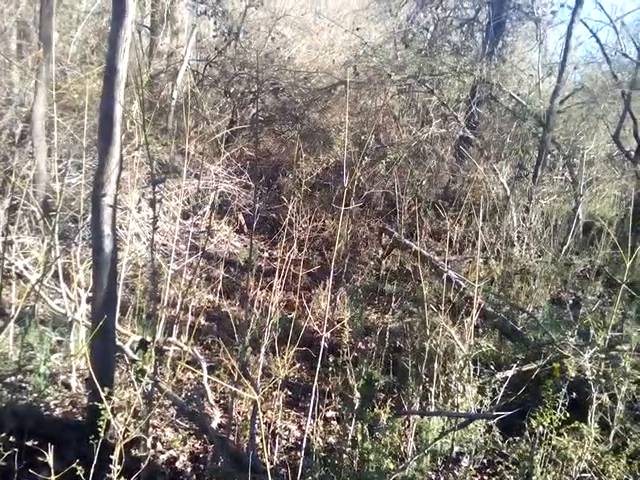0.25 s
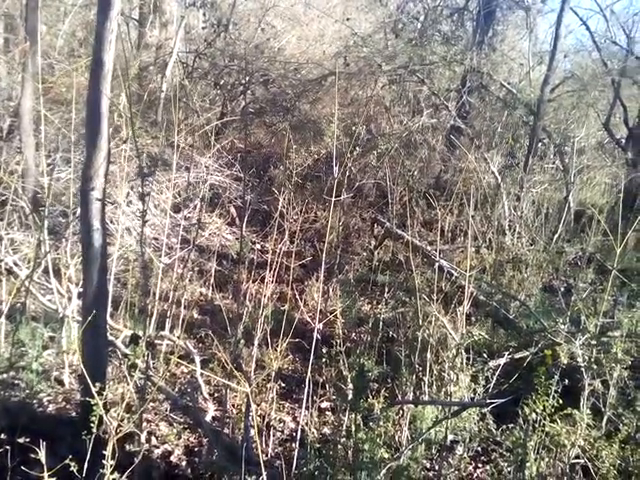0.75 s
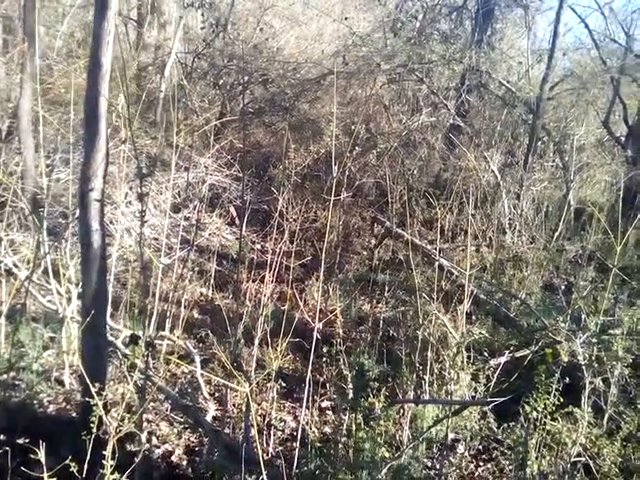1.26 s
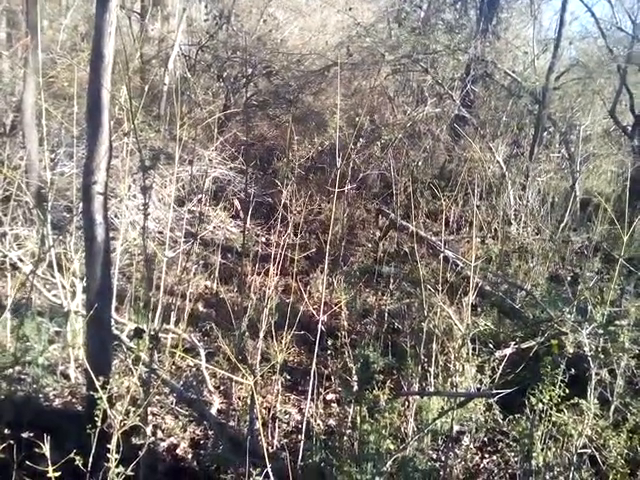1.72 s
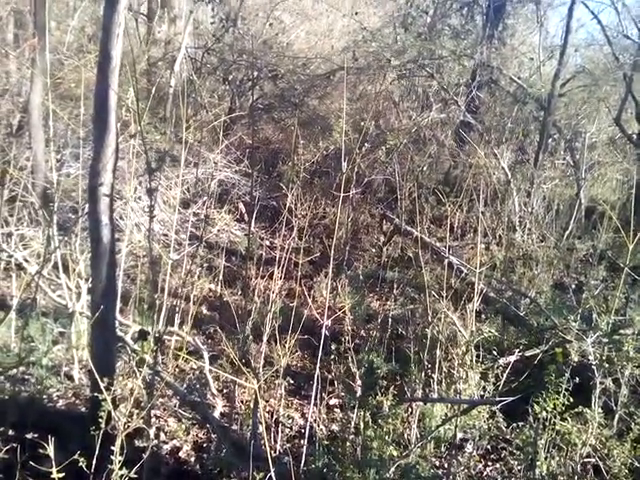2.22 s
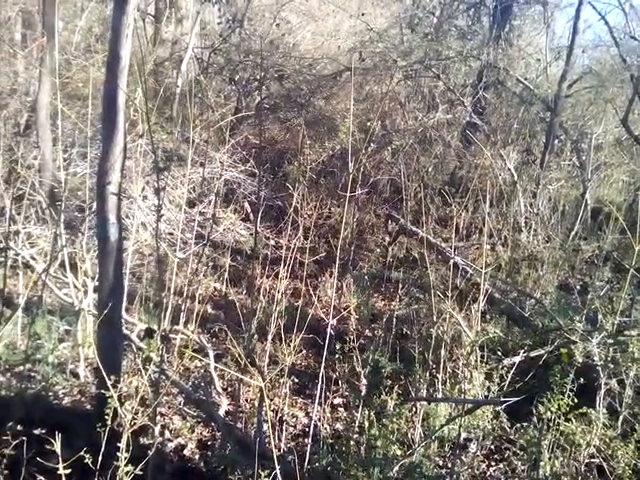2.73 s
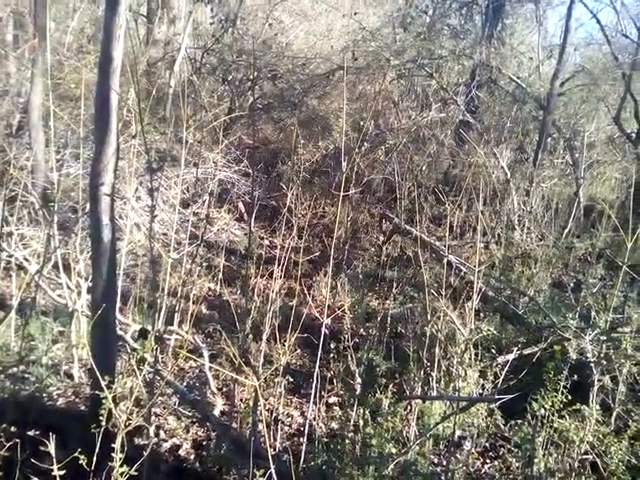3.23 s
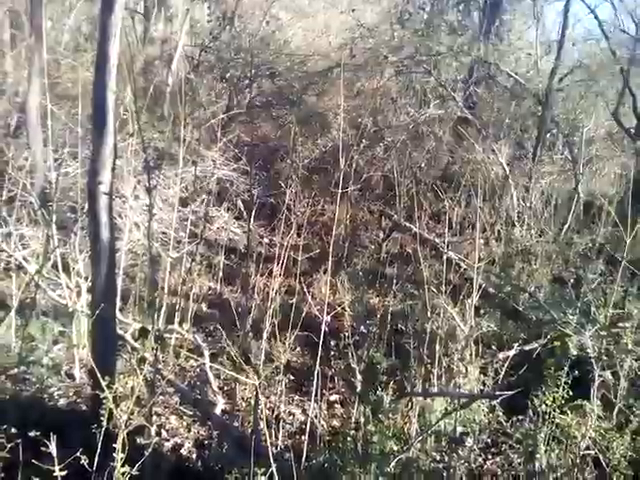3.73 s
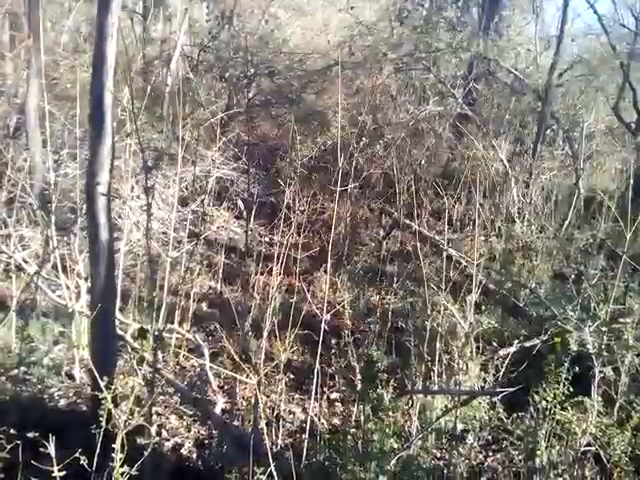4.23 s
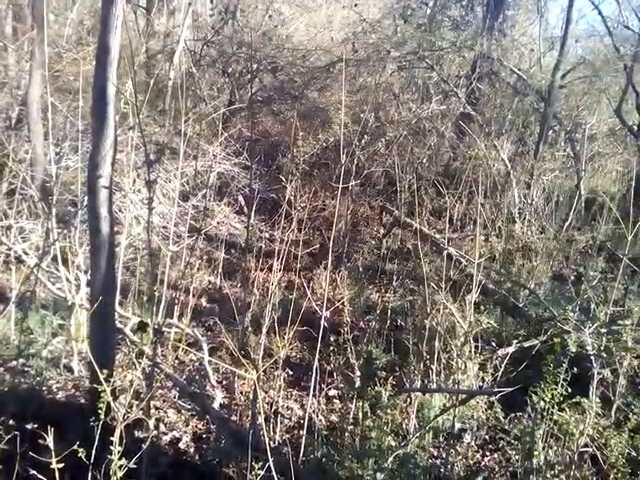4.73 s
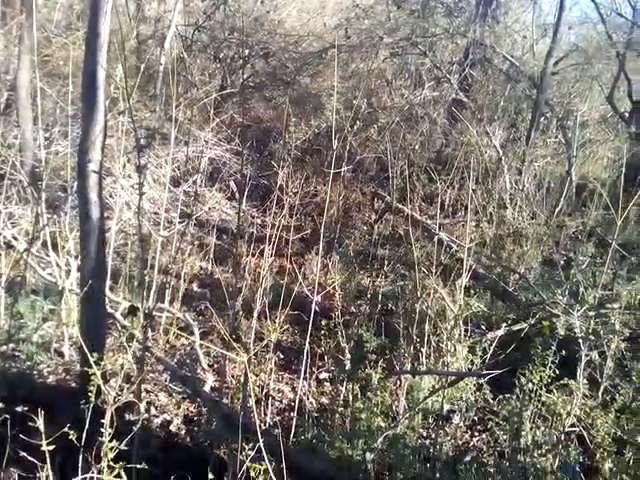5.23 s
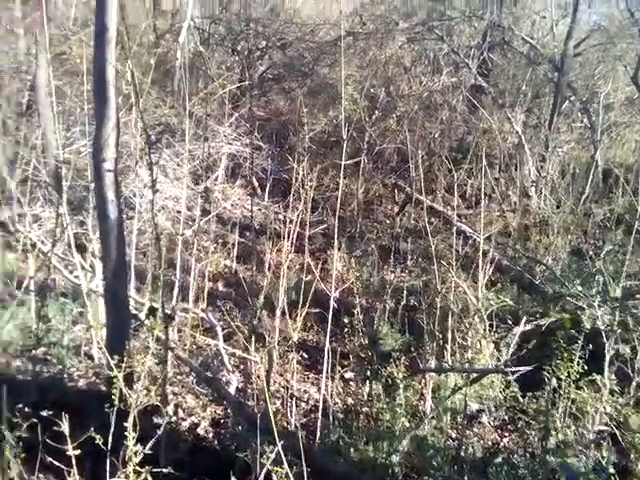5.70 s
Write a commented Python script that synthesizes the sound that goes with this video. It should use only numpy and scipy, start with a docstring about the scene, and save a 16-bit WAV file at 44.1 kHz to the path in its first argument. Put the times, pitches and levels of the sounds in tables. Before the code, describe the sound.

A single distant hound gives one short breaking bay that echoes through winter woodland, while small birds call and twigs snap loudly close by.

```python
"""Winter woodland: a hound far off gives one breaking bay, drawn as a few wavering harmonics,
that rings on among the trunks. Small birds, gliding tones, call near and far, and a wren rolls
its motif. Close to the hand-held microphone twigs snap, two of them loudly, as struck resonances;
dry leaves rustle in grainy noise and the hand bumps the case in single low cycles and rumbles on it.
Behind it all lie a rumble of shaped noise and a wavering two-tone motor hum."""
import sys
import numpy as np
from scipy import signal
from scipy.fft import rfft, irfft
from scipy.io import wavfile
from scipy.ndimage import uniform_filter1d

SR = 44100
rng = np.random.default_rng(int(sys.argv[2]) if len(sys.argv) > 2 else 0)


def output_pcm(signal):
    """Save a mono or channel-first signal as 16-bit PCM at the path in sys.argv[1].

    Samples are clipped to [-1, 1] before scaling.
    """
    pcm = np.clip(np.atleast_2d(signal).T, -1, 1) * 32767
    wavfile.write(sys.argv[1], SR, np.round(pcm).astype(np.int16))


N = 262836
T = np.arange(N) / SR  # s

# main note of the bay, before BAY_TRIM_DB
# columns: t/s, level of the fundamental/dB, level of the 2nd harmonic/dB, level of the 3rd/dB
BAY_NOTE = [(1.292, -37.5, -43.5, -83.5), (1.312, -40.5, -53, -56), (1.336, -34.5, -48, -40),
            (1.358, -53.5, -54.5, -43), (1.382, -32, -47, -42), (1.412, -35.5, -44, -43),
            (1.43, -40.5, -47, -55)]
# two cracked high notes that open the bay
# columns: t/s, length/s, mid-note f/Hz, level/dB, 2nd and 3rd harmonic level against the fundamental/dB
CRACKED_NOTES = [(1.235, .018, 944, -40, -25, -4), (1.25, .036, 1210, -40, -13.5, -26)]
CRACK_RISE_HZ_PER_S, NOTE_EDGE_S = 500, 0.0027
BAY_HZ, BAY_DROP_HZ, BAY_SETTLE_S, BAY_TRIM_DB = 657.8, 105.7, 0.02183, -.6


def bay_notes():
    """Pitch and three harmonic gains per note: the voice cracks twice, then sinks to its main pitch."""
    times, *levels = np.transpose(BAY_NOTE)
    hz = BAY_HZ + BAY_DROP_HZ * np.exp(-np.maximum(T - times[0], 0) / BAY_SETTLE_S)
    level_db = BAY_TRIM_DB + np.array([np.interp(T, times, level) for level in levels])
    notes = [(hz, undb(level_db) * gate(times[0], times[-1], NOTE_EDGE_S))]
    for s, length, mid_hz, db, second_db, third_db in CRACKED_NOTES:
        hz = mid_hz + CRACK_RISE_HZ_PER_S * np.clip(T - s - length / 2, -length, length)
        level_db = db + np.array([[0], [second_db], [third_db]])
        notes.append((hz, undb(level_db) * gate(s, s + length, NOTE_EDGE_S)))
    return notes


# the ring of an earlier bay on the same note is still heard at the start
RING_DB, RING_END_S = -59.5, .27


def hound(jitter=0.0068, upper_db=-26, hoarse_db=-19.5, slope_delay_s=.275, slope_db=-13):
    """A cracking voice of unsteady harmonics and hoarse breath; the far slope throws it back."""
    rasp = colour(rng.standard_normal(N), [(500, -22), (1000, 11), (1900, -21), (2950, 6),
                                           (3700, -5.5), (4400, -21), (5900, 1), (7500, -22)])
    waver, voice = 1 + jitter * walk(300), 0
    for hz, gains in bay_notes():
        phase = 2 * np.pi * np.cumsum(hz * waver) / SR
        main = sum(gain * np.sin(k * phase) for k, gain in enumerate(gains, 1))
        upper = sum(np.sin(k * phase) / (1 + (k * hz / 4000) ** 8) for k in (4, 5, 6))
        # the strained high notes are the hoarsest, and the breath pulses with the voice
        hoarse = undb(hoarse_db) * (hz / 1235) ** 2 * (1 + np.sin(phase)) * rasp
        voice = voice + main + gains[0] * (undb(upper_db) * upper + hoarse)
    voice *= np.sqrt(2) * undb(walk(250))
    add(voice, slope_delay_s, undb(slope_db) * ring(voice, 1030, 540))
    earlier = np.sin(2 * np.pi * np.cumsum(BAY_HZ * (1 + 0.013 * walk(61))) / SR)
    voice += undb(RING_DB + 3.1 * walk(21.2)) * earlier * gate(-1, RING_END_S, .08)
    return woods(voice, wet_db=-3, t60=1.93, thicket_db=-8, thicket_t60=0.171, damping=0.58)


# twigs breaking
# columns: t/s, level/dB, f of the crack/Hz, width of the crack/Hz, splintering level/dB
TWIG_SNAPS = [(1.334, -32, 6500, 4000, 1), (1.4150, 12, 6100, 3200, -7), (1.727, -30, 5970, 4844, -2),
              (3.548, -30.5, 6050, 3500, 1), (5.622, -23, 6000, 5000, -15), (5.6424, -2.5, 2980, 6660, -22)]
# modes of dry twigs; columns: f/Hz, width/Hz, level/dB
TWIG_MODES = [(1496, 250, -2), (3150, 270, -7.5), (4100, 280, -8), (6530, 580, -9.5)]


def twigs(splinter_s=0.013, tick_db=-19, thud_db=-16, dull_hz=9500):
    """A sharp break rings the wood; its last fibres part just after."""
    out = np.zeros(N)
    t = T[:SR // 20]
    for s, db, hz, width_hz, splinter_db in TWIG_SNAPS:
        fibres = rng.standard_normal(len(t)) * undb(2.8 * rng.standard_normal(len(t)))
        fibres /= 1 + (t / splinter_s) ** 8
        force = signal.unit_impulse(len(t)) + undb(splinter_db) * fibres / np.linalg.norm(fibres)
        crack = ring(ring(force, hz, width_hz), hz, width_hz)
        body = undb(-0.5) * crack
        for mode_hz, mode_width_hz, mode_db in TWIG_MODES:
            body = body + undb(mode_db) * ring(crack, mode_hz, mode_width_hz)
        body = signal.lfilter(*signal.butter(2, dull_hz, fs=SR), body)
        # thinner, higher twigs also give more of a bright tick; the ground answers with a dull thud
        tick = undb(tick_db) * (hz / 6000) ** 5 * ring(force, 12400, 3000)
        thud = undb(thud_db) * ring(force, 210, 210)
        add(out, s, undb(db) * (body + tick + thud))
    return woods(out, wet_db=-22, t60=1.2, thicket_db=-19.5, thicket_t60=0.54)


# scuffs in the leaf litter
# columns: t/s, length/s, crackle level/dB, low thud level against the crackle/dB
LEAF_SCUFFS = [(5.734, 0.033, -49.5, -23), (5.772, 0.023, -53, -11), (5.789, 0.0124, -56.5, 9.5),
               (5.805, .012, -55, -8)]
# slow swells of stirring leaves; columns: middle t/s, half length/s, level/dB
LEAF_STIRS = [(.05, 0.37, -65.5), (2.9, 0.87, -71.5), (3.48, .13, -67.5), (5.46, 0.15, -57.5),
              (5.64, 0.074, -58.5), (5.83, .1, -60)]
# spectrum of the crackle; columns: f/Hz, relative level/dB
LEAF_SPECTRUM = [(200, 7), (600, 4.5), (1500, -1), (2500, -2), (4500, -2), (6800, -4), (11000, -18),
                 (16000, -32)]
RUSTLE_DB = -74  # steady part, under the stirs


def leaves():
    """Many tiny breaks make a dense crackle; it swells with each stir and scuff, and scuffs also thud."""
    grains = rng.standard_normal(N) * undb(3 * rng.exponential(size=N))
    crackle = colour(grains, LEAF_SPECTRUM)
    thud = unit(ring(ring(rng.standard_normal(N), 330, 340), 330, 340))
    push = (undb(RUSTLE_DB) + swells(LEAF_STIRS)) * undb(2 * walk(45))
    weight = np.zeros(N)
    for s, length, db, thud_db in LEAF_SCUFFS:
        scuff = undb(db) * signal.windows.tukey(int(length * SR), .2)
        add(push, s, scuff)
        add(weight, s, undb(thud_db) * scuff)
    return crackle * push + thud * weight


# bumps of the hand on the case; columns: t of the peak/s, peak level/dB
HAND_BUMPS = [(.520, -32), (0.585, -36.5), (.608, -28), (2.746, -27), (2.813, -38), (4.421, -44),
              (4.46, -37.5), (4.524, -38)]
BUMP_HZ = 97.6


def bumps(cycles=0.39):
    """Each bump rocks the case for about one low cycle."""
    out = np.zeros(N)
    t = T[:SR // 10] - .05  # centred on the peak
    rock = -np.cos(2 * np.pi * BUMP_HZ * t) * np.exp(-.5 * (t * BUMP_HZ / cycles) ** 2)
    for s, db in HAND_BUMPS:
        add(out, s + t[0], undb(db) * rock)
    return out


# thin high calls that fall to a held pitch and then warble above it
# columns: t/s, held f/Hz, level/dB, warble depth/Hz, level change in the warble/dB
THIN_CALLS_NEAR = [(.018, 7280, -46, 550, -5), (1.161, 8250, -56.5, 1310, 1), (2.406, 7250, -56.5, 500, -8)]
THIN_LENGTH_S, THIN_FALL, THIN_SETTLE_S = .15, 0.24, .019  # the fall is a share of the held pitch
THIN_WARBLE_AFTER_S, THIN_WARBLE_RATE_HZ = .06, 30
# short falling chips; columns: t/s, level/dB
FALLING_CHIPS = [(0.918, -55), (2.052, -57), (3.237, -56), (5.308, -61)]
CHIP_LENGTH_S, CHIP_START_HZ, CHIP_END_HZ = 0.0087, 5660, 5360
# even whistles; columns: t/s, length/s, f/Hz, level/dB
EVEN_WHISTLES = [(0, 0.028, 4900, -61.5), (0, 0.032, 4420, -60.5), (2.447, .13, 4955, -56.5),
                 (3.19, .05, 1857, -61), (4.585, 0.028, 4420, -64.5), (4.667, .032, 4300, -71)]


def near_birds():
    """Small birds on nearby branches: single tones that fall and warble, chip or hold their pitch."""
    out, t = np.zeros(N), T[:int(THIN_LENGTH_S * SR)]
    late = np.maximum(t - THIN_WARBLE_AFTER_S, 0)
    warble = np.sin(np.pi * THIN_WARBLE_RATE_HZ * late) ** 2
    for s, held_hz, db, warble_hz, warble_db in THIN_CALLS_NEAR:
        hz = held_hz * (1 + THIN_FALL * np.exp(-t / THIN_SETTLE_S)) + warble_hz * warble
        level_db = db + warble_db * np.minimum(late * THIN_WARBLE_RATE_HZ, 1)
        add(out, s, whistle(hz, level_db, tremble=.007))
    for s, db in FALLING_CHIPS:
        add(out, s, whistle(glide(CHIP_LENGTH_S, CHIP_START_HZ, CHIP_END_HZ), db))
    for s, length, hz, db in EVEN_WHISTLES:
        add(out, s, whistle(glide(length, hz, hz), db, tremble=.006))
    return woods(out, wet_db=-3, t60=1.27, thicket_db=-5.5, thicket_t60=0.34, direct_db=-2.5)


# one rolling motif, note by note
# columns: t from the motif's start/s, length/s, start f/Hz, middle f/Hz, end f/Hz, level/dB
WREN_MOTIF = [(0, .018, 3650, 3720, 3850, -4.5), (0.025, 0.038, 3270, 2890, 2870, -5.5),
              (.05, 0.025, 2235, 2140, 2280, -5.5), (0.072, 0.023, 2340, 2562, 2460, -0.5),
              (0.135, 0.026, 3100, 3330, 3100, -9.5), (0.162, .042, 2940, 2350, 1820, -6)]
# its repeats; columns: t/s, level/dB
WREN_REPEATS = [(0, -63), (.15, -61), (1.985, -66), (2.264, -57.5), (2.538, -57), (2.808, -55),
                (3.085, -55), (3.368, -55)]
WREN_SCATTER_DB = 1.2


def wren():
    """A rolling motif, each note bent through three pitches."""
    out = np.zeros(N)
    for start, db in WREN_REPEATS:
        for s, length, *pitches, note_db in WREN_MOTIF:
            # no two renderings are quite alike in pitch or force
            detune, force = rng.standard_normal(2)
            bend = np.polyfit([0, .5, 1], pitches, 2)
            hz = np.polyval(bend, np.linspace(0, 1, int(length * SR))) * (1 + .015 * detune)
            level_db = db + note_db + WREN_SCATTER_DB * force
            add(out, start + s, whistle(hz, level_db, tremble=0.014))
    return woods(out, wet_db=-0.5, t60=3.1, thicket_db=-5, thicket_t60=0.21, direct_db=-2)


# rising whistles from deeper in the wood, swelling as they climb
# columns: t/s, length/s, start f/Hz, top f/Hz, level at the top/dB
RISING_WHISTLES = [(0.599, .215, 2747, 4166, -51.5), (2.331, .15, 2325, 4356, -52.5),
                   (3.002, 0.12, 3196, 4280, -54.5), (3.651, .19, 2453, 4016, -55),
                   (3.929, 0.055, 3500, 4120, -59.5), (5.345, 0.13, 3250, 4290, -60),
                   (5.514, 0.077, 3340, 4160, -53), (5.756, 0.094, 3400, 4220, -62)]
RISE_SWELL_DB_PER_OCTAVE, RISE_LEVELS_OFF_S = 12, .085
FLUTTER_DEPTH_HZ, FLUTTER_RATE_HZ = 135, 62
# high slurs, up or down; columns: t/s, length/s, start f/Hz, end f/Hz, level/dB
HIGH_SLURS = [(.838, .06, 6830, 7100, -77), (1.575, 0.04, 6480, 7000, -66),
              (2.681, 0.021, 7000, 5990, -63.5), (2.777, 0.04, 6750, 7330, -64.5),
              (4.536, .04, 6910, 6430, -63), (4.573, 0.043, 6440, 7120, -62.5),
              (4.812, 0.032, 6900, 6180, -65), (4.863, 0.034, 6100, 7670, -58)]


def far_birds(strand_ratio=1.09, strand_db=-11):
    """Gliding whistles and high slurs, smeared by distance; the rising ones sound in two strands."""
    out = np.zeros(N)
    for s, length, start_hz, top_hz, db in RISING_WHISTLES:
        # short calls climb straight, long ones level off
        hz = glide(length, start_hz, top_hz, ease=max(1, length / RISE_LEVELS_OFF_S))
        level_db = db + RISE_SWELL_DB_PER_OCTAVE * np.log2(hz / top_hz)
        # a fast flutter roughens the climb and dies out at the top
        flutter = FLUTTER_DEPTH_HZ * np.sin(2 * np.pi * FLUTTER_RATE_HZ * T[:len(hz)])
        flutter *= np.linspace(1, 0, len(hz))
        add(out, s, whistle(hz + flutter, level_db, tremble=.008))
        # the other side of the syrinx adds a weaker, higher strand
        add(out, s, whistle(strand_ratio * hz + flutter, level_db + strand_db, tremble=0.016))
    for s, length, start_hz, end_hz, db in HIGH_SLURS:
        add(out, s, whistle(glide(length, start_hz, end_hz, ease=1.75), db, tremble=0.017))
    return woods(out, wet_db=-1, t60=1.53, thicket_db=-0.5, thicket_t60=0.6, direct_db=-3)


# spectrum of the far rumble and air; columns: f/Hz, relative level/dB
AIR_SPECTRUM = [(20, -20.5), (45, -6.5), (75, -1), (120, -2.5), (200, -14), (300, -18.5), (550, -19),
                (800, -12.5), (1050, -13), (1600, -23.5), (3200, -28.5), (7000, -36.5), (16000, -37.5)]
AIR_DB = -53.5
# low rumbles as the hand shifts on the recorder, on the hum's lower pitch
# columns: middle t/s, half length/s, level/dB
HANDLING_SWELLS = [(1.45, 0.16, -63.5), (2.45, 0.4, -72), (4.45, 0.16, -64), (5.45, 0.18, -54.5)]
HUM_DB, HUM_OCTAVE_DB = -61, -65.5  # a far motor's firing line and the octave above


def background(hum_hz=74):
    """Far rumble and air as shaped noise, a wavering motor hum, and handling rumbles on its lower pitch."""
    air = colour(rng.standard_normal(N), AIR_SPECTRUM) * undb(AIR_DB + .5 * walk(11))
    phase = 2 * np.pi * np.cumsum(hum_hz * (1 + 0.0246 * walk(9))) / SR
    # the motor's firing line and the handling rumbles share one wavering tone
    low_gain = undb(HUM_DB) + swells(HANDLING_SWELLS)
    low = low_gain * undb(1.6 * walk(5.4)) * np.sin(phase)
    octave = undb(HUM_OCTAVE_DB) * undb(1.6 * walk(5.4)) * np.sin(2 * phase)
    return air + np.sqrt(2) * (low + octave)


def woods(x, wet_db, t60, thicket_db, thicket_t60, direct_db=0, damping=0.35):
    """Direct sound, quick scatter from the undergrowth and a long tail from the trunks; t60/s at 1 kHz."""
    response = 0
    for db, decay in ((wet_db, t60), (thicket_db, thicket_t60)):
        f, t, cells = signal.stft(rng.standard_normal(2 * SR), SR)
        # foliage soaks up the treble first
        loss = (np.maximum(f, 300)[:, None] / 1000) ** damping / decay
        fade = 1000 ** (-t * loss) * (1 - np.exp(-t / 0.0031))
        echoes = signal.istft(cells * fade, SR)[1]
        response = response + undb(db) * echoes * np.sqrt(2 * np.log(1000) / decay / SR)
    return undb(direct_db) * x + signal.fftconvolve(x, response)[:N]


def whistle(hz, db, tremble=.01):
    """A bird's tone along a pitch path, with rounded ends and a slight tremble."""
    u = np.linspace(0, 1, len(hz))
    shake = np.interp(u, np.linspace(0, 1, 24), rng.standard_normal(24))
    tone = np.sin(2 * np.pi * np.cumsum(hz * (1 + tremble * shake)) / SR)
    return undb(db) * np.sqrt(2) * np.abs(np.sin(np.pi * u)) ** 0.14 * tone


def glide(length, start_hz, end_hz, ease=2.8):
    """A pitch that, for ease above 1, moves fast at first and levels off at its goal."""
    return end_hz + (start_hz - end_hz) * np.linspace(1, 0, int(length * SR)) ** ease


def ring(x, hz, width_hz):
    """One resonance, gain 1 at its centre."""
    return signal.lfilter(*signal.iirpeak(hz, hz / width_hz, fs=SR), x)


def colour(x, points):
    """Shape x by a (f/Hz, level/dB) spectrum; rms 1."""
    hz, db = np.transpose(points)
    f = np.maximum(np.fft.rfftfreq(len(x), 1 / SR), 1)
    gain = undb(np.interp(np.log(f), np.log(hz), db))
    return unit(irfft(rfft(x) * gain, len(x)))


def swells(table):
    """Sum of smooth rises and falls in gain."""
    return sum(undb(db) * np.exp(-((T - s) / half_length) ** 2) for s, half_length, db in table)


def gate(start, end, edge):
    """1 between two times, with smooth edges."""
    return .5 + .5 * np.tanh(2 * np.minimum(T - start, end - T) / edge)


def walk(rate):
    """Smooth chance with spread near 1, redrawn at a rate in Hz."""
    k = int(SR / rate)
    steps = np.repeat(rng.standard_normal(N // k + 1), k)
    return 1.268 * uniform_filter1d(uniform_filter1d(steps, k), k)[:N]


def undb(db):
    """Decibels to gain."""
    return 10 ** (np.asarray(db) / 20)


def unit(x):
    """Scale to rms 1."""
    return x / np.sqrt(np.mean(x ** 2))


def add(out, s, x):
    """Mix x into out from time s."""
    i = int(s * SR)
    out[i:i + len(x)] += x[:max(N - i, 0)]


def scene():
    """All sources at one microphone."""
    woodland = hound() + near_birds() + far_birds() + wren()
    close = twigs() + leaves() + bumps()
    return (woodland + close + background())[None]


# the treble peaks near 6.7 kHz, sinks into a trough and rises again near 15 kHz; columns: f/Hz, level/dB
TREBLE_RESPONSE = [(5000, -0.5), (6700, 2.5), (7400, -2.5), (8300, -11), (13600, -10.5), (14800, 1),
                   (16000, 2)]
TOP_HZ = 15550


def record(dry):
    """The treble is coloured, with a peak, a trough and a rise near 15 kHz, and the recorder cuts the top."""
    hz, db = np.transpose(TREBLE_RESPONSE)
    gain = undb(np.interp(np.fft.rfftfreq(512, 1 / SR), hz, db))
    # folding the cepstrum forward in time gives the treble shaping a minimum-phase response
    cepstrum = irfft(np.log(gain))
    treble = irfft(np.exp(rfft(cepstrum * np.r_[1, np.full(255, 2), np.zeros(256)])))
    top_cut = signal.ellip(10, .2, 70, TOP_HZ, fs=SR, output="sos")
    return signal.sosfilt(top_cut, signal.lfilter(treble, 1, dry))


dry = scene()
out = record(dry)
output_pcm(out)
```